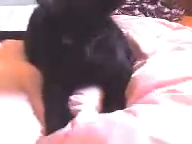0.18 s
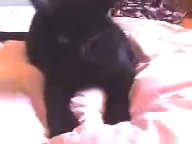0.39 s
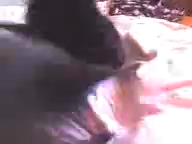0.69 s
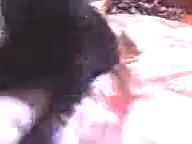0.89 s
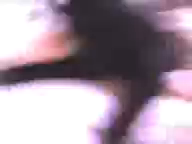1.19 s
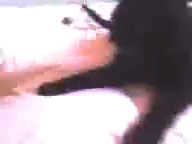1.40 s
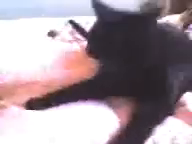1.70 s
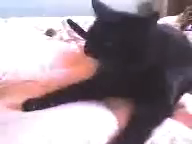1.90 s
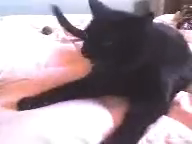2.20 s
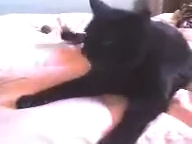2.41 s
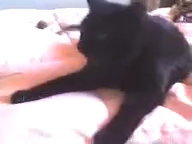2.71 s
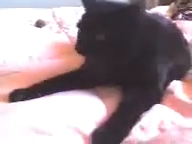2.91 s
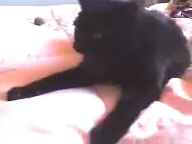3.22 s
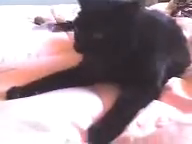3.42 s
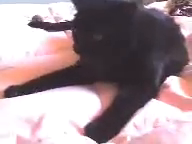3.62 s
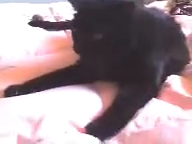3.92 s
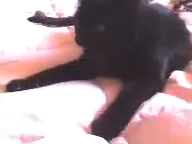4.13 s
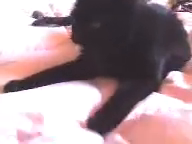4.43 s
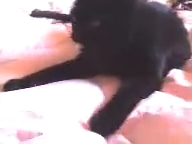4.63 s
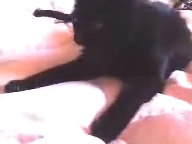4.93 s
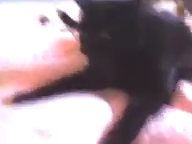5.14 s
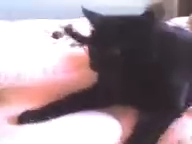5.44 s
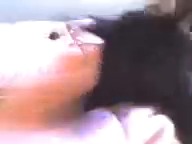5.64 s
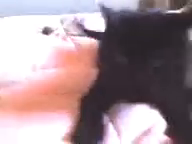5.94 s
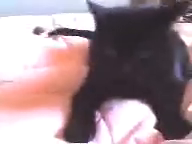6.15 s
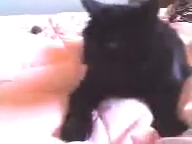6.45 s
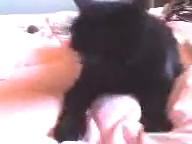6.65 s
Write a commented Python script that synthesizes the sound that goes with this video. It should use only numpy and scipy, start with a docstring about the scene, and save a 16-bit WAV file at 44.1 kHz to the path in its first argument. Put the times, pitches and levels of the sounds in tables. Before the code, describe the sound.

Close, narrow camera sound: cat's quiet grumble, bedding thuds, sudden scream, long rattling hiss, low pulsing growl rising and sinking, one short yelp.

```python
"""A cat on a bed, close to a small camera's microphone: it grumbles, snarls, spits and hisses, then growls,
lifting early into a moan that sinks to a long low rattle and ends in a sharp yelp. Its voice is vocal-fold
pulses and puffs of air through resonances of head and mouth; the hiss is noise past bared teeth over a
throat rattle. Shaped noise makes the bedding's slides and thuds, the quick swipes and a background hiss.
The bedroom is soft and dry; the camera passes little above 4 kHz and clips the loudest peaks."""
import sys
import numpy as np
from scipy import signal
from scipy.fft import rfft, irfft, next_fast_len
from scipy.io import wavfile
from scipy.ndimage import uniform_filter1d

SR = 44100
rng = np.random.default_rng(int(sys.argv[2]) if len(sys.argv) > 2 else 0)


def to_wav(sig):
    """Store sig (one row per channel, or 1-D mono) as 16-bit WAV at the path in sys.argv[1].

    Samples outside -1..1 are clipped; the rate is SR.
    """
    pcm = np.clip(np.atleast_2d(sig), -1, 1) * 32767
    pcm = np.round(pcm).astype(np.int16)
    wavfile.write(sys.argv[1], SR, pcm.T)  # frames by channels


N = 298557
TIME = np.arange(N) / SR  # s


def amp(db):
    """Decibels to gain."""
    return 10 ** (np.asarray(db) / 20)


def evened(x):
    """Unit level overall."""
    return x / np.sqrt(np.mean(x ** 2) + 1e-20)


def steadied(x, size=1100):
    """Unit level over a few cycles (size in samples), leaving the single pulses as they are."""
    power = uniform_filter1d(uniform_filter1d(x ** 2, size), size)
    return x / np.sqrt(abs(power) + 1e-14)


def curves(rows):
    """Each column of a table, joined by straight lines in time."""
    s, *columns = np.transpose(rows)
    return [np.interp(TIME, s, c) for c in columns]


def during(rows):
    """One while the table lasts, with 10 ms fades inside its ends."""
    to_nearest_end = np.minimum(TIME - rows[0][0], rows[-1][0] - TIME)
    return np.clip(to_nearest_end * 100, 0, 1)


def between(shut, wide, opening):
    """A value that follows the opening of the mouth."""
    return shut + (wide - shut) * opening


def burst(s, rise, decay, hold=0):
    """An exponential swell to a peak at s, a hold, and a dying away (all in seconds)."""
    before = (s - TIME) / rise
    after = (TIME - s - hold) / decay
    return np.exp(-np.clip(np.maximum(before, after), 0, 50))


def colour(x, points):
    """Filters by a short spectrum of (f/Hz, gain/dB)."""
    hz, db = np.transpose(points)
    size = next_fast_len(N + 4096)
    f = np.fft.rfftfreq(size, 1 / SR)
    gain = amp(np.interp(np.log(f + 1), np.log(hz + 1), db))
    return irfft(rfft(x, size) * gain, size)[:N]


def noise():
    """White noise."""
    return rng.standard_normal(N)


def wander(per_s):
    """Chance drift of unit size, with so many new values a second joined by straight lines."""
    return evened(np.interp(TIME * per_s, np.arange(N), noise()))


def resonate(x, hz, width):
    """A steep two-stage resonance of gain 1 that can follow a curve."""
    turn = np.exp(2j * np.pi * np.cumsum(hz * np.ones(N)) / SR)
    r = np.exp(-np.pi * width / SR)
    # shift the resonance down to 0 Hz, smooth twice, shift back up
    smoothed = signal.lfilter([(1 - r) ** 2], [1, -2 * r, r * r], x / turn + 1e-18)
    return 2 * (turn * smoothed).real


def tract(x, modes, factor=1):
    """Neighbouring resonances add with alternating sign; the factor shifts them all."""
    ringing = sum((-1) ** k * amp(db) * resonate(x, hz * factor, width)
                  for k, (hz, width, db) in enumerate(modes))
    return steadied(ringing)


def folds(pitch, rough, jitter, shimmer, air, puff):
    """The vocal folds slap shut once a cycle; roughness upsets timing and force and lets a puff of air through."""
    turns = np.cumsum(pitch) / SR
    early, force = rng.standard_normal((2, 4000))
    turns = turns + jitter * rough * np.interp(turns, np.arange(len(early)), early)
    cycle = np.maximum.accumulate(np.floor(np.maximum(turns, 0)).astype(int))
    slaps = np.diff(cycle, prepend=0) * np.sqrt(SR / pitch)
    puffs = evened(np.exp(-(turns % 1) / puff) * noise())
    # strong and weak cycles tend to alternate
    strength = np.exp(shimmer * rough * (force[cycle] + cycle % 2 - .5))
    return strength * (1 - rough) * slaps, strength * air * rough * puffs


# Steady background hiss: f/Hz, gain/dB
FLOOR_SPECTRUM = [(15, -62), (25, -32.5), (134, -13.5), (228, -3), (306, 2), (379, -2.5), (510, -9.5),
                  (644, -11.5), (1030, -12.5), (2450, -18.5), (3170, -18), (4000, -35), (5200, -72.5),
                  (8800, -120)]


def background_hiss(level_db=-54):
    """Steady coloured noise."""
    return amp(level_db) * evened(colour(noise(), FLOOR_SPECTRUM))


def rattling(pitch, rough, rough_drift=.34):
    """Slow, uneven slaps of the folds on a wavering pitch, each trailing a puff of air."""
    pitch = pitch * np.exp(.017 * wander(22))
    rough = rough * np.exp(rough_drift * wander(10))
    return folds(pitch, np.clip(rough, .1, .6), jitter=.23, shimmer=.5, air=1.3, puff=.3)


# Resonances of the closed head at tension 1: f/Hz, stage width/Hz, relative level/dB
HEAD = [(204, 73, -8), (331, 169, 7), (418, 160, -4)]


def hum(slaps, puffs, tension):
    """The pulses ring low in the closed head; the turbulent air adds a faint rumble below."""
    ring = tract(slaps + 0.89 * puffs, HEAD, tension)
    ring = colour(ring, [(40, -14), (105, -16.5), (145, -9.5), (185, -0.5), (470, -0.5), (600, -4), (1200, -9.0)])
    rumble = steadied(colour(puffs, [(20, -21.0), (70, 1), (150, 5), (300, -15.5), (800, -50.0)]))
    return ring + amp(-30.0) * rumble


def grumble(pitch_hz=101, rough=.42, level_db=-45, tension=.97, hold_s=.19, decay_s=.125):
    """The end of a quiet closed-mouth growl: it keeps around one pitch and dies away."""
    fade = np.exp(-np.maximum(TIME - hold_s, 0) / decay_s)
    return amp(level_db) * fade * hum(*rattling(pitch_hz, rough), tension)


# The cat shifts and the bedding slides under it: t/s, length/s, level/dB
SLIDES = [(0.303, 0.17, -46), (0.555, 0.36, -49.5), (1.197, 0.2, -40.5), (1.446, .1, -43.5),
          (1.621, 0.815, -49.5), (2.497, .62, -63), (5.51, .41, -52.5), (6.099, .6, -62),
          (6.74, .03, -53.5)]
# Colour of the sliding cloth: f/Hz, gain/dB
CLOTH = [(35, -51), (60, -20.5), (85, -31), (147, -21.5), (253, -7.5), (393, -4), (429, -7.5), (559, -13.5),
         (1150, -10), (1390, -13.5), (1780, -15), (3180, -22.5), (4000, -39.5), (5200, -67), (8800, -120)]
# Paws and body pushing into the duvet: t/s, level/dB, decay/s
THUMPS = [(0.589, -42.5, 0.028), (0.652, -42.5, 0.033), (.711, -41.5, 0.062), (0.805, -27, 0.015),
          (.826, -24.5, .013), (0.843, -30, .006), (1.31, -24.5, 0.017), (1.37, -43.5, .05),
          (1.452, -44, 0.013), (1.696, -35, 0.019), (2.626, -45, .011), (2.819, -43, .018),
          (6.76, -55.5, .037)]
# Colour of the padding under the paws: f/Hz, gain/dB
PAD = [(18, -60.5), (30, -18.5), (130, -16), (223, -2.5), (288, 0.5), (342, 10.5), (383, 0), (697, -10),
       (900, -7.5), (1170, -40.5), (1980, -120)]


def bedding(slide_rise_s=.082, slide_decay_s=.06, thump_rise=.4):
    """Cloth slides in small catches and thuds under the paws; a thump's rise is a share of its decay."""
    slides = [amp(db) * burst(s, slide_rise_s, slide_decay_s, length) for s, length, db in SLIDES]
    speed = np.max(slides, axis=0)
    catches = noise() * amp(1.3 * wander(220))
    slide = speed * evened(colour(catches, CLOTH))
    push = sum(amp(db) * burst(s, thump_rise * decay, decay) for s, db, decay in THUMPS)
    return slide + push * steadied(colour(noise(), PAD))


# Swipes, spits and snaps of cloth: t/s, level/dB, rise/s, decay/s, centre f/Hz, width/octaves
SWIPES = [(.778, -42, .0008, .006, 1790, 1), (.803, -32, .017, 0.023, 1060, 0.87),
          (.832, -31, .002, 0.0082, 990, 0.77), (0.848, -30, .002, 0.0029, 900, .56),
          (.946, -40.5, .0026, .005, 1100, .24), (1.202, -34.5, .007, 0.016, 2690, 0.19),
          (1.293, -32, .01, 0.031, 1870, 0.56), (1.2985, -13, .0021, 0.0034, 1115, 0.32),
          (1.3068, -22, .0007, .0057, 1120, 0.36), (1.373, -39.5, .005, 0.0073, 1100, 0.69),
          (1.385, -26, .0012, 0.0052, 1640, 0.19), (1.449, -39, .0046, .006, 1940, 0.21),
          (1.632, -47, .002, .015, 2000, .9), (1.672, -22, .0005, 0.0056, 2000, 2.8),
          (1.813, -36.5, .004, 0.0075, 1000, 0.25), (2.364, -38.5, .0005, .0016, 2300, 0.39),
          (2.603, -50, .001, .003, 2000, .8), (3.077, -48.5, .001, .003, 3100, .2),
          (3.098, -51, .006, .012, 3100, .25), (6.057, -47, .0008, 0.003, 1298, 0.76)]


def swipes():
    """Each quick move is a short rush of noise around its own pitch."""
    out, size = np.zeros(N), 16384
    hz = np.fft.rfftfreq(size, 1 / SR) + 1
    for s, db, rise, decay, centre, octaves in SWIPES:
        shape = np.exp(-.5 * (np.log2(hz / centre) / octaves) ** 2)
        rush = evened(irfft(rfft(rng.standard_normal(size)) * shape))
        out += amp(db) * burst(s, rise, decay) * np.resize(rush, N)
    return out


# What the open mouth radiates: f/Hz, gain/dB
LIPS = [(20, -17.5), (70, -7), (200, -3.5), (2650, -1.5), (3050, -1), (3500, -10), (4200, -12.5)]


def cry(rows, throat, hum_db=-33.5, hum_lag=.94, closed_s=.037, closed_db=13.5):
    """An open-mouthed scream: fast, torn pulses through three resonances that sweep with the jaw."""
    level_db, pitch, rough, jaw = curves(rows)
    drive = sum(folds(pitch, np.clip(rough, 0, .9), jitter=.14, shimmer=.6, air=1.0, puff=.42))
    # behind closed lips at the start the hum gains on the throat
    closed = np.clip((rows[0][0] + closed_s - TIME) / 0.01, 0, 1)
    # as the cry rises past hum_db the hum falls behind, hum_lag dB per dB
    bands = [(345, 210, hum_lag * (hum_db - level_db) + closed_db * closed)]
    for shut_hz, wide_hz, shut_db, wide_db, width in throat:
        bands.append((between(shut_hz, wide_hz, jaw), width, between(shut_db, wide_db, jaw)))
    sound = sum(amp(db) * steadied(resonate(drive, hz, width), size=600) for hz, width, db in bands)
    return during(rows) * amp(level_db) * steadied(colour(sound, LIPS), size=320)


# The snarl: t/s, level/dB, pitch f/Hz, roughness 0-1, jaw opening 0-1
SNARL = [(.95, -48, 129.5, .5, 0), (.968, -29, 139.5, .42, 0), (.987, -22.5, 161.5, .3, .1),
         (1.018, -25, 182.7, .39, .45), (1.055, -10.5, 350.6, .52, .88), (1.088, -8.5, 369.9, .38, 1),
         (1.108, -12.5, 364.3, 0.62, .88), (1.13, -16, 446.6, .3, 0.84), (1.153, -13.5, 427.3, 0.3, 0.32),
         (1.171, -14, 427, 0.2, 0.09), (1.197, -36, 459, .35, .2), (1.228, -36.5, 426, .2, .3),
         (1.255, -63.5, 400, .7, .3)]
# Its throat resonances: shut f/Hz, wide f/Hz, shut level/dB, wide level/dB, stage width/Hz
SNARL_THROAT = [(1020, 1060, -8, -7, 300), (1560, 2200, -0.5, 0.5, 374), (2040, 2622, -13.5, 5.5, 374)]


def snarl():
    """A torn scream that leaps up in pitch as the jaw opens."""
    return cry(SNARL, SNARL_THROAT)


HISS_END_S, HISS_RISE_S, HISS_RELEASE_S = 2.35, 0.029, 0.02


def spat(s, peak_db, held_db, settle_s):
    """Pressure overshoots at the spit, settles and holds until the hiss ends."""
    overshoot = np.exp(-np.maximum(TIME - s, 0) / settle_s)
    level = amp(held_db + (peak_db - held_db) * overshoot)
    return level * burst(s, HISS_RISE_S, HISS_RELEASE_S, HISS_END_S - s)


# Lower resonances of the bared mouth: f/Hz, stage width/Hz, relative level/dB
HISS_LOW = [(759, 250, 0), (1010, 300, 4), (1997, 860, -2.5)]
# Its upper resonances, at the teeth: f/Hz, stage width/Hz, relative level/dB
HISS_HIGH = [(2644, 830, 12.5), (3370, 410, 4)]


def hiss(push_s=2.187, push_width_s=.13, push_db=4, waver_db=-1.3, drift=.017):
    """Air rushes past bared teeth, with a second, gentler push, while the throat rattles slowly underneath."""
    rattle_hz = 58 * np.exp(0.19 * wander(20))
    rattle = sum(folds(rattle_hz, .55, jitter=.3, shimmer=0.21, air=2.1, puff=1.0))
    air = noise() * amp(2.7 * wander(160))
    tension = 1 + drift * wander(6)
    rush = spat(1.68, peak_db=-32.5, held_db=-42, settle_s=.12) * tract(air, HISS_LOW, tension)
    rush += spat(1.68, peak_db=-32.5, held_db=-46.5, settle_s=.14) * tract(air, HISS_HIGH, tension)
    push = push_db * np.exp(-((TIME - push_s) / push_width_s) ** 2) + waver_db * wander(9.38)
    throat = steadied(colour(resonate(rattle, 346, 160), LIPS))
    return amp(push) * rush + spat(1.7, peak_db=-29.5, held_db=-38.5, settle_s=.09) * throat


# Course of the growl, about which it wavers, up to an early moan and down again: t/s, pitch f/Hz
GROWL_PITCH = [(3.26, 99.13), (3.42, 111), (3.49, 122), (3.55, 164.9), (3.62, 169.1), (3.75, 197.3),
               (3.85, 184.4), (3.90, 145.3), (4.0, 135.6), (4.06, 125.6), (4.16, 125), (4.26, 109),
               (4.49, 115.3), (4.57, 108.1), (4.84, 110.9), (4.92, 101.3), (5.12, 101.5), (5.24, 106),
               (5.42, 104.7), (5.57, 96.3), (5.66, 103.2), (5.82, 125.6)]
# Its effort: t/s, hum level/dB
GROWL_HUM = [(3.24, -54.5), (3.32, -35), (3.39, -33.5), (3.45, -27), (3.51, -33), (3.79, -34), (4.02, -28),
             (4.3, -31.5), (4.5, -30), (4.9, -29), (5.58, -36.5), (5.73, -31), (5.82, -38.5)]
# Its mouth: t/s, opening (0 shut, 1 teeth bared), f/Hz behind the tongue, f/Hz at the front
GROWL_MOUTH = [(3.52, 0.084, 572, 1890), (3.62, 0.56, 810, 1905), (3.73, 0.99, 1082, 1864),
               (3.89, 1.013, 1000, 1730), (3.95, .68, 1255, 1456), (4.27, 0.16, 1090, 1684),
               (4.33, 0.69, 1038, 1830), (4.43, 0.96, 1010, 1850), (4.52, 0.71, 1140, 1930),
               (4.82, .8, 1130, 1973), (5.05, 0.5, 1120, 1660), (5.26, .15, 1020, 1600),
               (5.65, -.08, 971, 1617), (5.73, 0.83, 985, 1640), (5.79, 0.86, 986, 1659),
               (5.82, 1.27, 1000, 1650)]
# Air wheezing between the teeth: f/Hz, stage width/Hz, relative level/dB
WHEEZE = [(2250, 600, -2), (3294, 450, 0)]
# Each pair: mouth shut, teeth bared
GROWL_ROUGH, RASP_DB, BRIGHT_DB = (.17, .27), (-51, -29), (-62, -39.5)


def growl(tension_start=1.078, slacken_per_s=.055, throat_share=.8, throat_top_hz=826):
    """A closed-mouth hum; as the lips part, the rasping throat comes through on the same pulses."""
    opening, tongue_hz, front_hz = curves(GROWL_MOUTH)
    slaps, puffs = rattling(curves(GROWL_PITCH)[0], between(*GROWL_ROUGH, opening))
    # the head's resonances sag as the air runs out
    tension = tension_start - slacken_per_s * (TIME - GROWL_PITCH[0][0])
    closed = amp(curves(GROWL_HUM)[0]) * hum(slaps, puffs, tension)
    rasp = slaps + 2.2 * puffs
    # the lowest resonance rises with the tongue's, up to a limit
    throat_hz = np.minimum(throat_share * tongue_hz, throat_top_hz)
    throat = tract(rasp, [(throat_hz, 260, -3.5), (tongue_hz, 310, 0)])
    edge = tract(rasp + puffs, [(front_hz, 400, 0), (1.45 * front_hz, 600, -18)])
    edge = colour(edge, [(600, -15.0), (1300, -2.5), (4000, -3.5)])
    opened = amp(between(*RASP_DB, opening)) * throat + amp(between(*BRIGHT_DB, opening)) * edge
    # midway, air wheezes between the teeth on each pulse
    wheeze = amp(-59) * burst(4.36, rise=.043, decay=.043, hold=.64) * tract(rasp + puffs, WHEEZE)
    return during(GROWL_HUM) * closed + during(GROWL_MOUTH) * opened + wheeze


# The yelp: t/s, level/dB, pitch f/Hz, roughness 0-1, jaw opening 0-1
YELP = [(5.775, -54.5, 129, .5, .1), (5.803, -30, 193, 0.56, 0), (5.82, -24, 255.6, 0.3, .05),
        (5.835, -16, 277.7, 0.25, 0.13), (5.85, -17, 306.4, .14, 0.88), (5.876, -21, 307.5, 0.12, 1),
        (5.893, -33.5, 296, 0.72, 0.79), (5.92, -33.5, 303.4, .6, .3), (5.945, -47, 308, .8, .5),
        (5.99, -59, 305, 0.83, .5)]
# Its throat resonances: shut f/Hz, wide f/Hz, shut level/dB, wide level/dB, stage width/Hz
YELP_THROAT = [(880, 820, -2.5, -10, 300), (1430, 1620, -1, 0, 320), (1970, 2460, -1, -6.5, 244)]


def yelp():
    """A short sharp cry at the end of the growl, its faint tail turning rough."""
    return cry(YELP, YELP_THROAT)


def bedroom(x, t60, wet_db):
    """Sparse reflections, soon swallowed by soft furnishings."""
    t = TIME[:SR // 2]
    hits = (rng.random(len(t)) < 2000 / SR) * (t > .004)  # about 2000 reflections a second
    taps = rng.standard_normal(len(t)) * hits * amp(-60 * t / t60)
    return x + amp(wet_db) * signal.fftconvolve(x, taps / np.linalg.norm(taps))[:N]


def scene():
    """The cat and the bedding in the room, over a steady background hiss."""
    floor = background_hiss()
    cat = grumble() + snarl() + hiss() + growl() + yelp()
    return (bedroom(cat + bedding() + swipes(), t60=0.24, wet_db=-18.0) + floor)[None]


# Response of the close camera microphone: f/Hz, gain/dB
CAMERA = [(20, -1), (3350, 0), (3600, -3), (4000, -5), (4400, -33.5), (4800, -73)]


def record(dry):
    """A narrow-band camera whose loudest peaks clip flat; then the band limit."""
    clipped = np.clip(colour(dry[0], CAMERA), -.72, .72)
    band_limit = signal.firwin(511, 15757, window=("kaiser", 9), fs=SR)  # low-pass, edge in Hz
    return signal.oaconvolve(clipped, band_limit, "same")[None]


dry = scene()
out = record(dry)
to_wav(out)
```